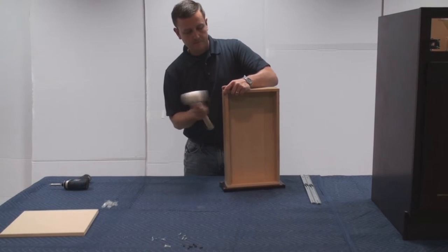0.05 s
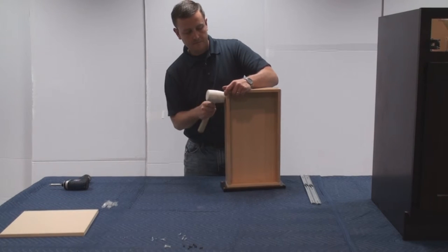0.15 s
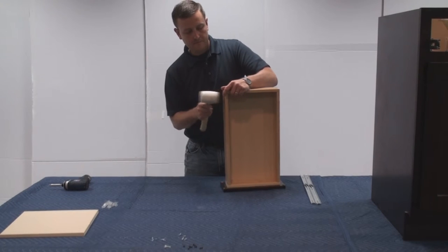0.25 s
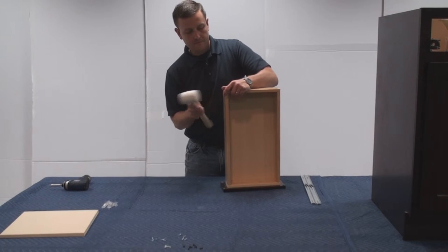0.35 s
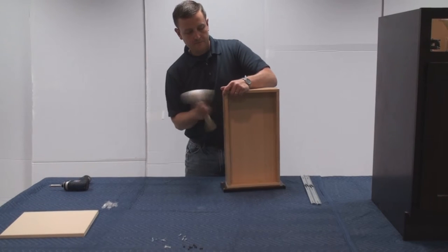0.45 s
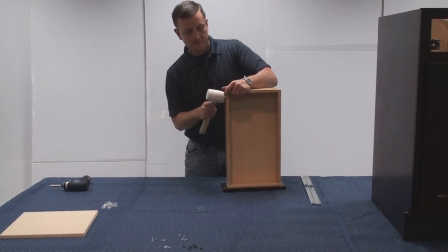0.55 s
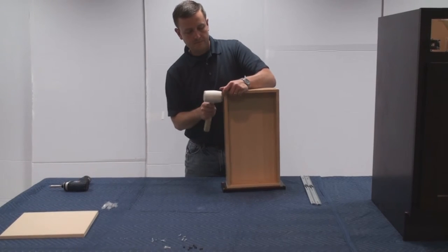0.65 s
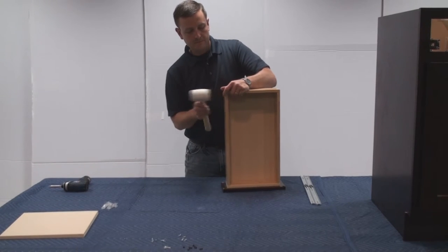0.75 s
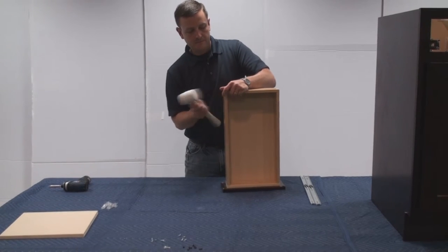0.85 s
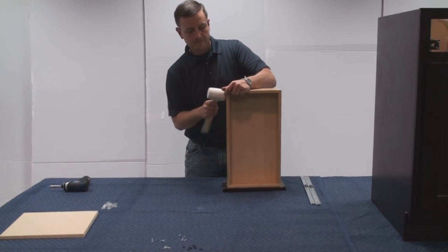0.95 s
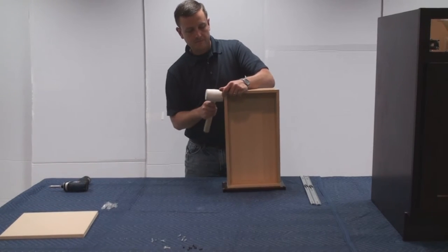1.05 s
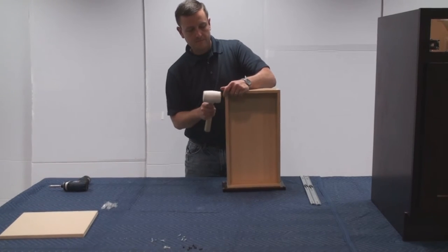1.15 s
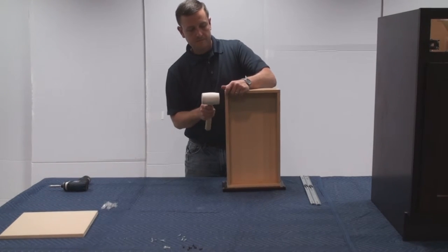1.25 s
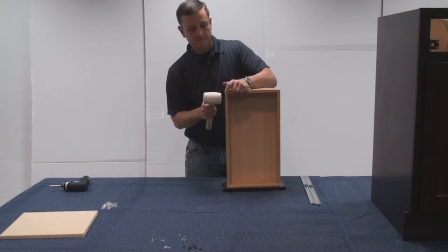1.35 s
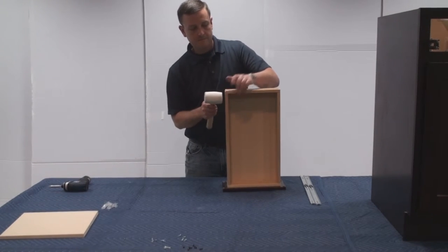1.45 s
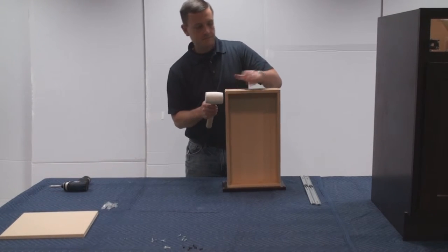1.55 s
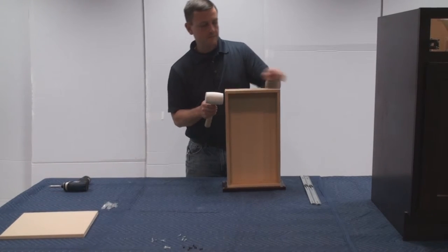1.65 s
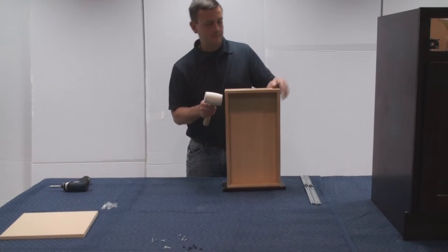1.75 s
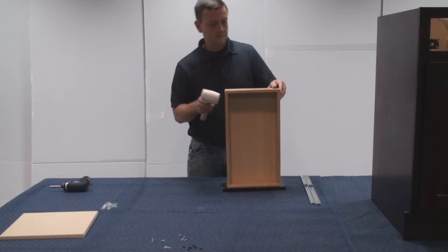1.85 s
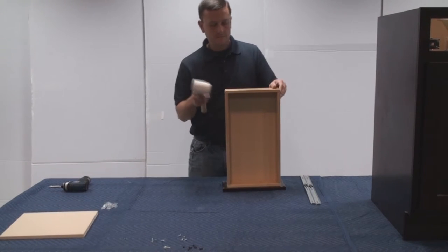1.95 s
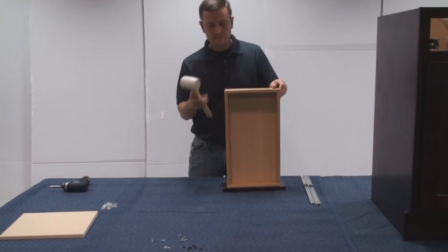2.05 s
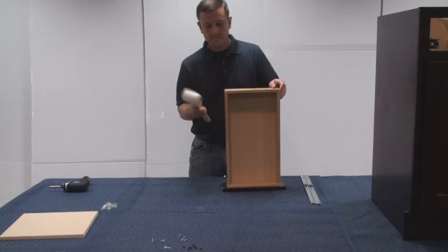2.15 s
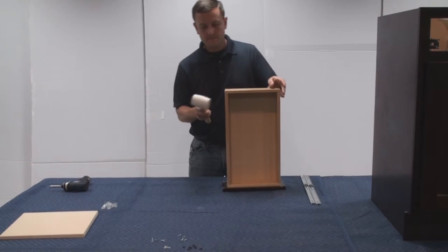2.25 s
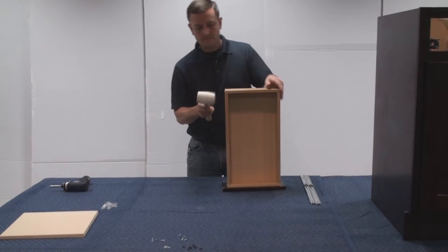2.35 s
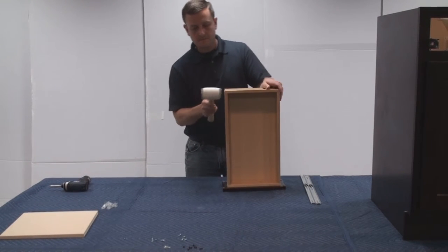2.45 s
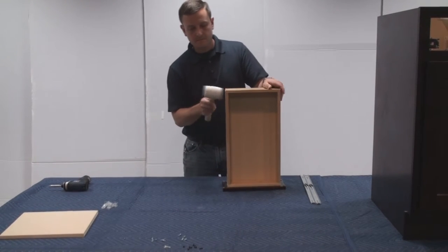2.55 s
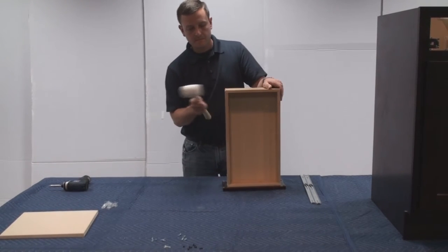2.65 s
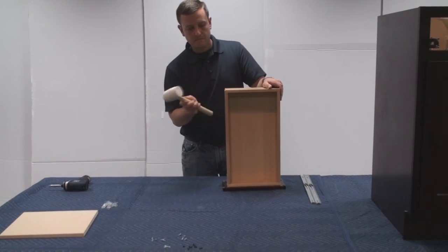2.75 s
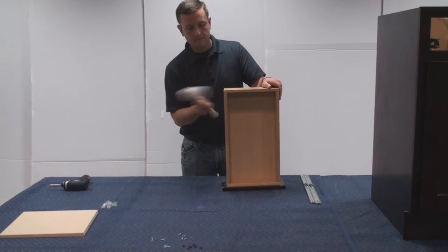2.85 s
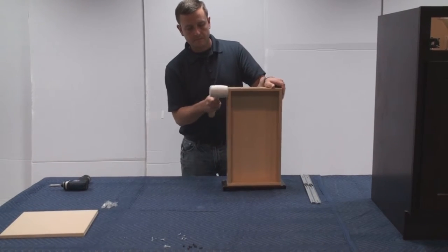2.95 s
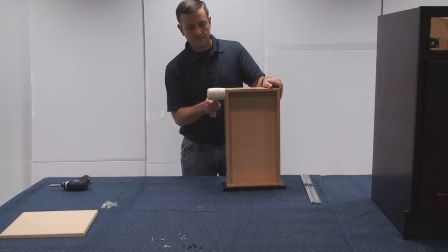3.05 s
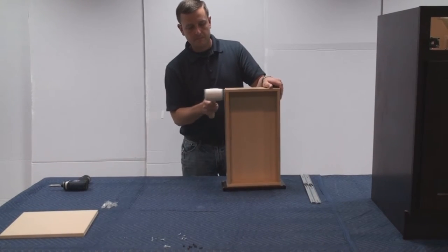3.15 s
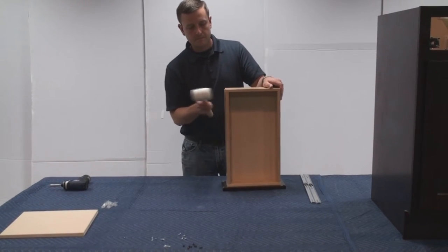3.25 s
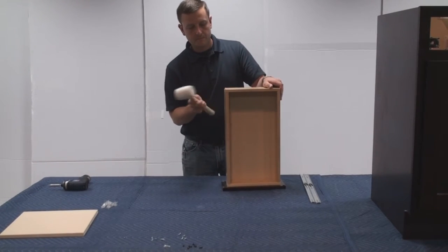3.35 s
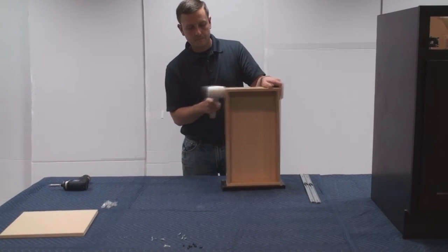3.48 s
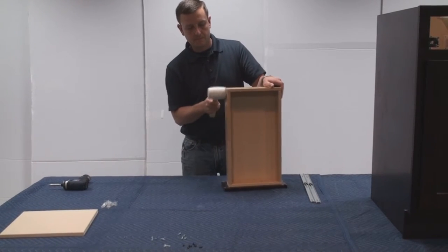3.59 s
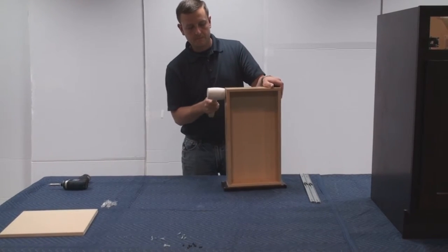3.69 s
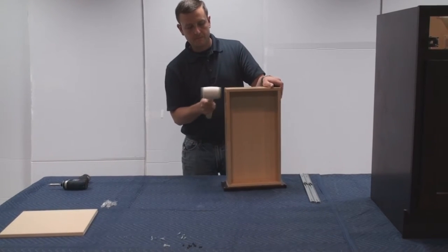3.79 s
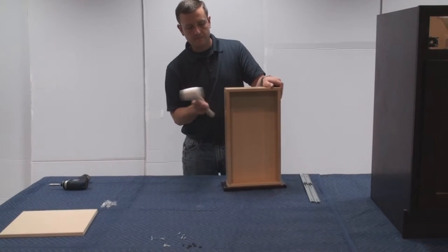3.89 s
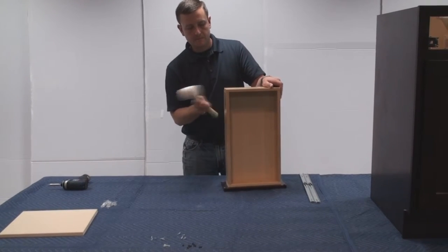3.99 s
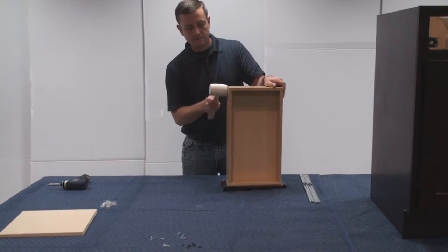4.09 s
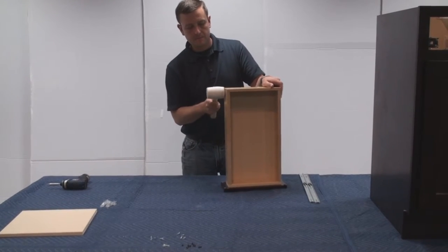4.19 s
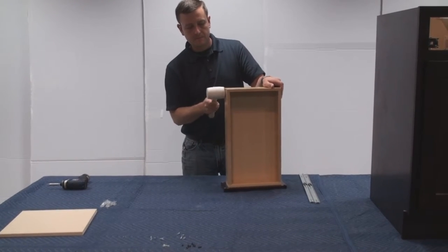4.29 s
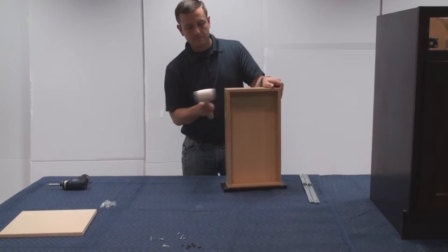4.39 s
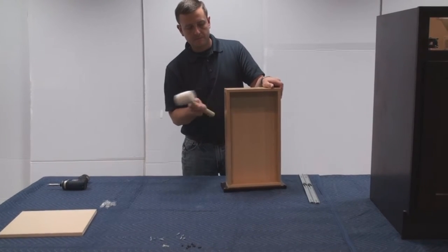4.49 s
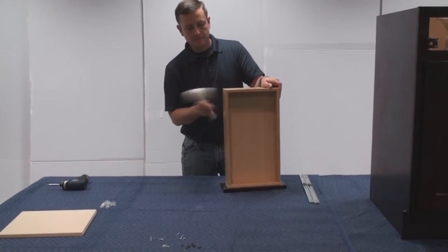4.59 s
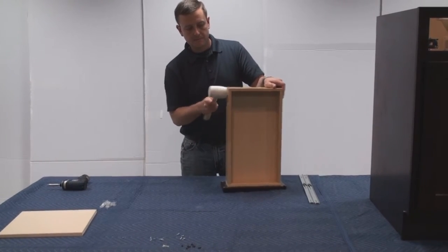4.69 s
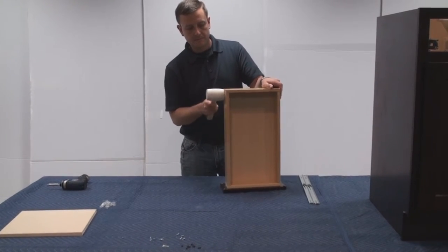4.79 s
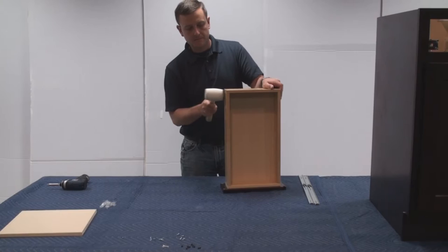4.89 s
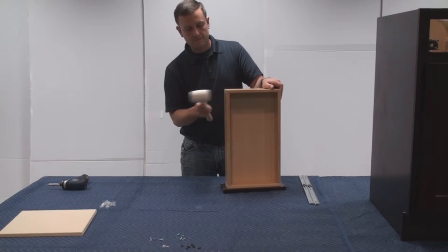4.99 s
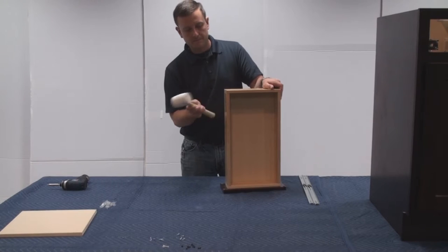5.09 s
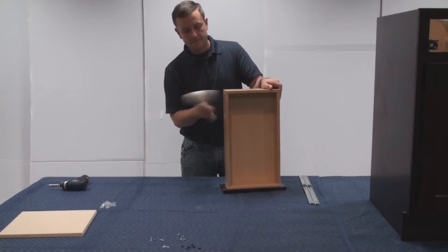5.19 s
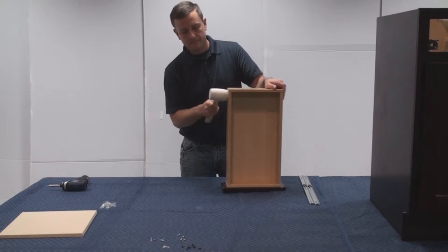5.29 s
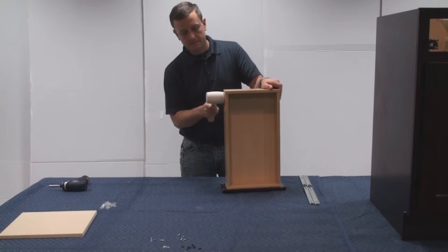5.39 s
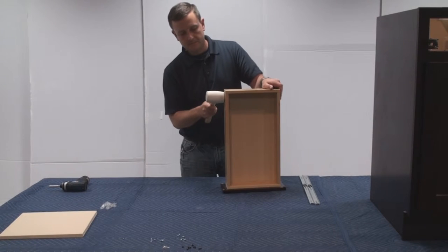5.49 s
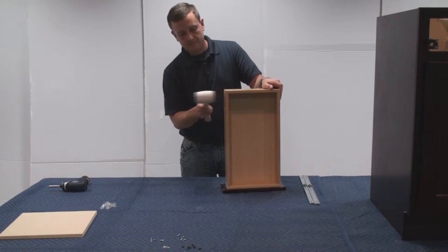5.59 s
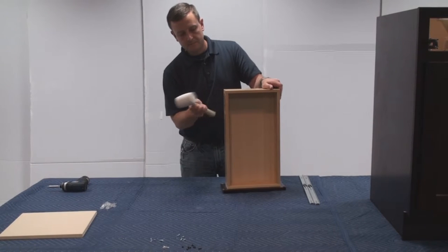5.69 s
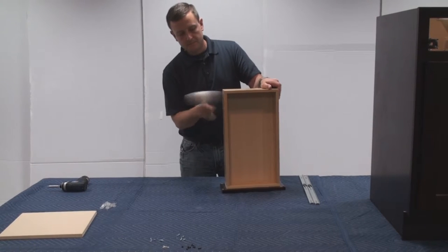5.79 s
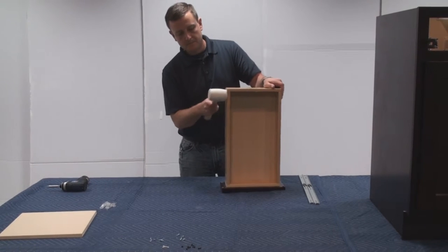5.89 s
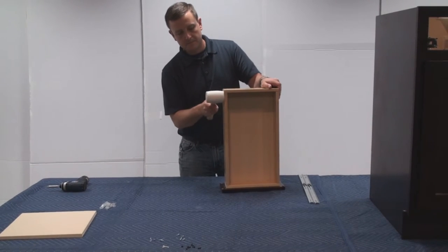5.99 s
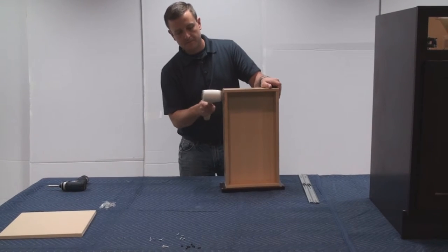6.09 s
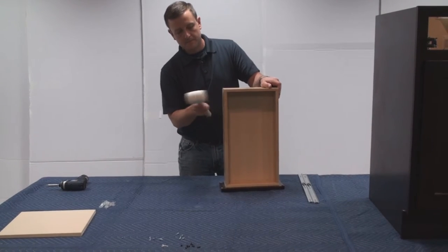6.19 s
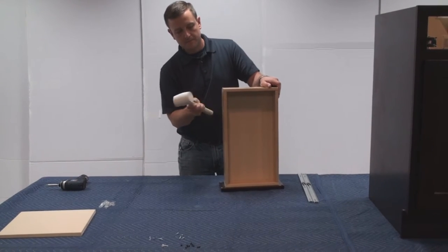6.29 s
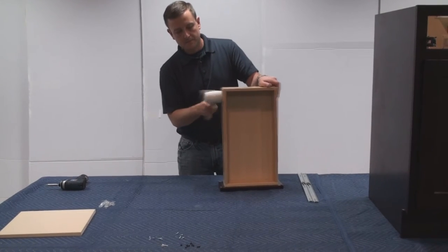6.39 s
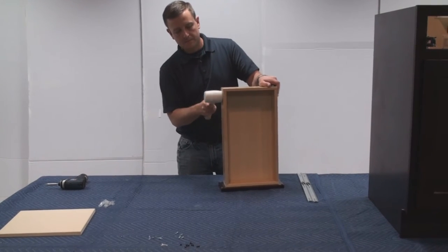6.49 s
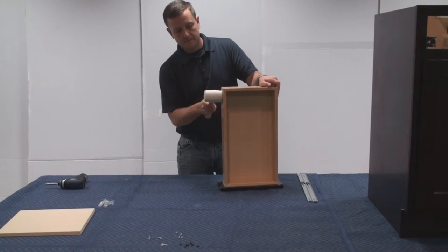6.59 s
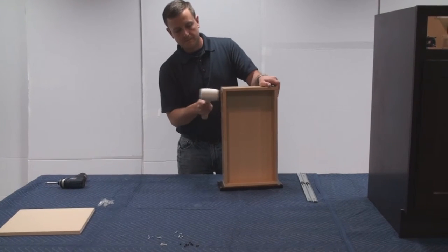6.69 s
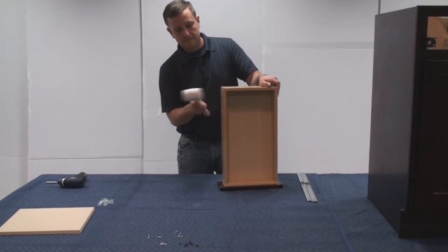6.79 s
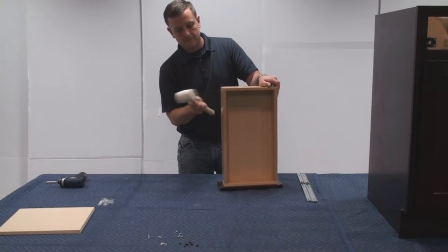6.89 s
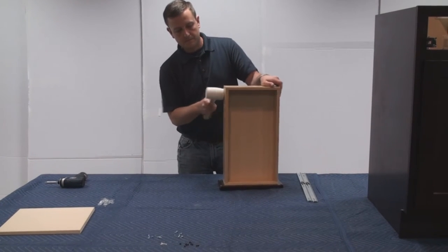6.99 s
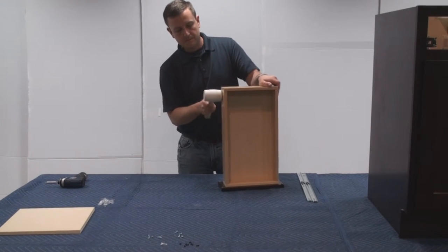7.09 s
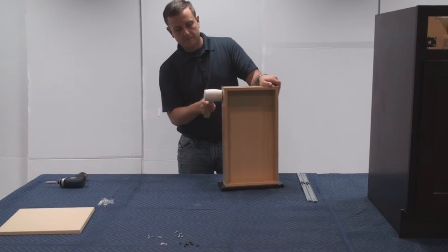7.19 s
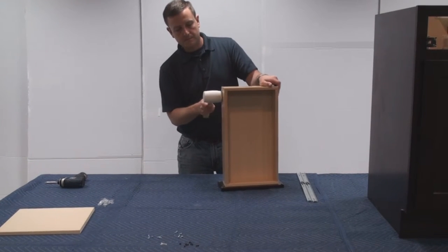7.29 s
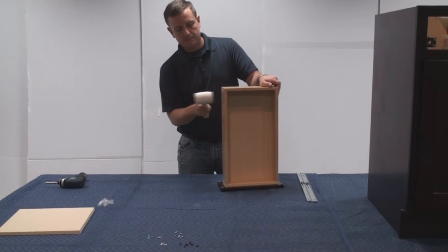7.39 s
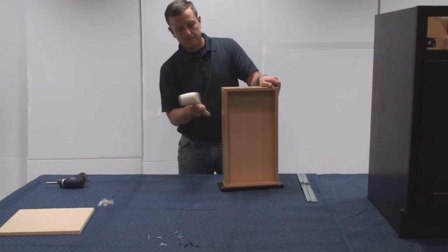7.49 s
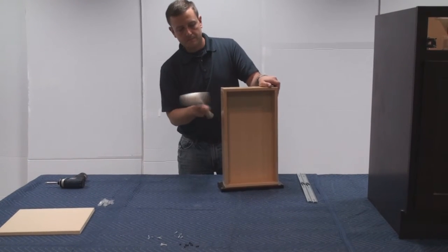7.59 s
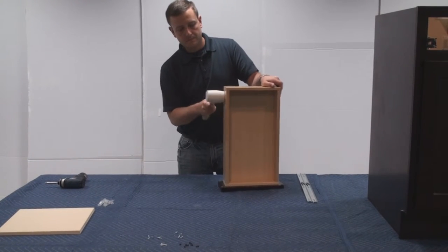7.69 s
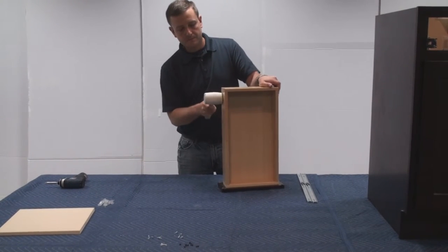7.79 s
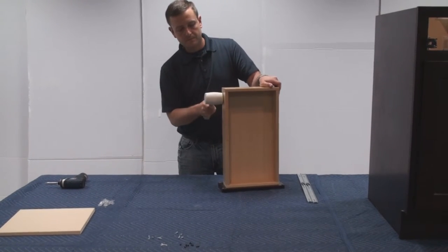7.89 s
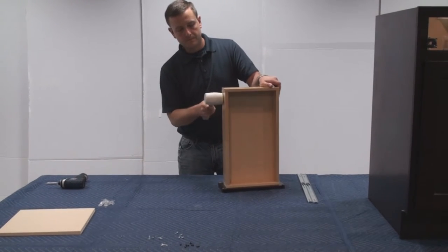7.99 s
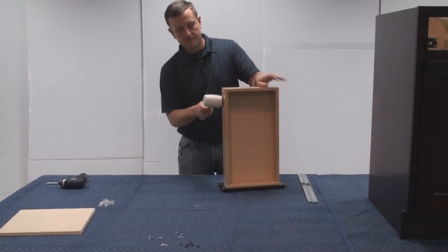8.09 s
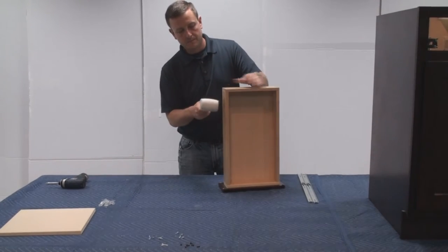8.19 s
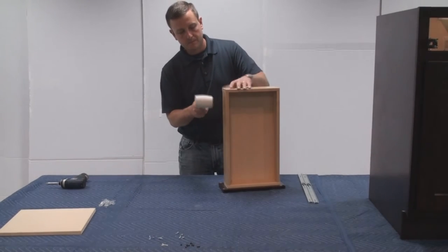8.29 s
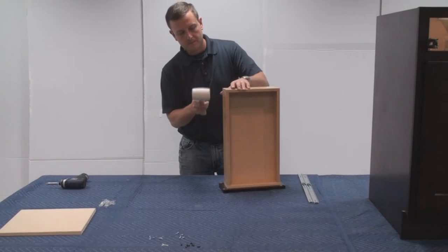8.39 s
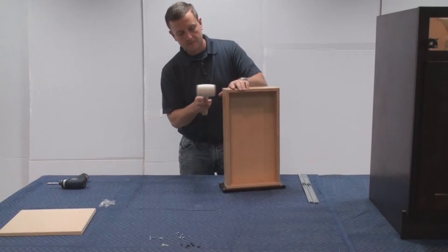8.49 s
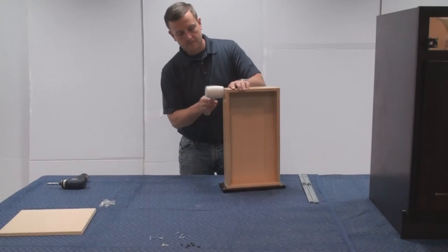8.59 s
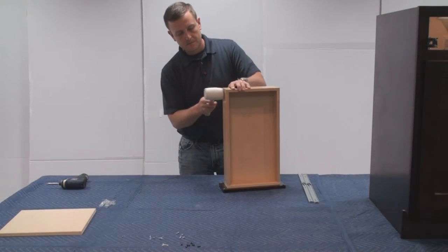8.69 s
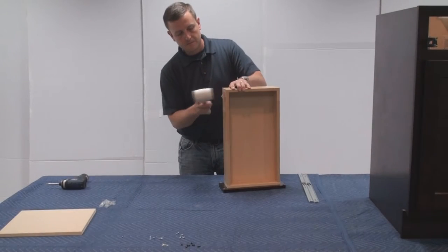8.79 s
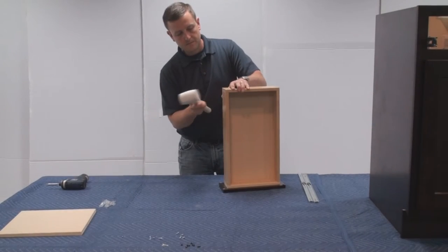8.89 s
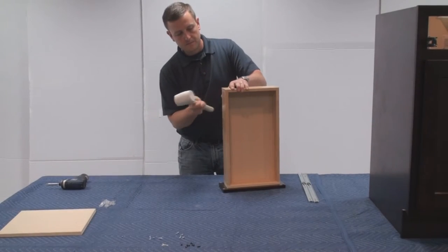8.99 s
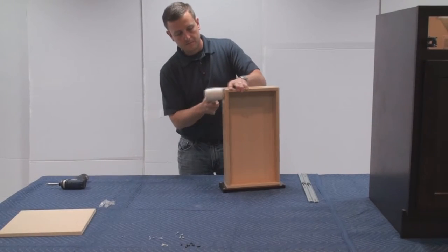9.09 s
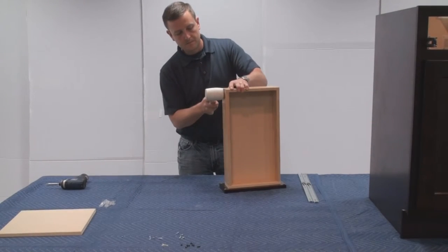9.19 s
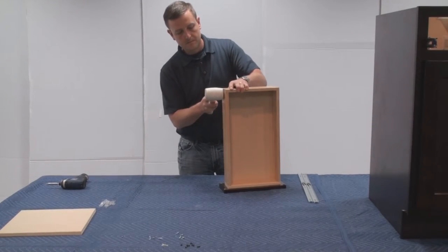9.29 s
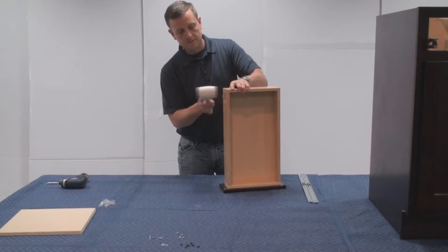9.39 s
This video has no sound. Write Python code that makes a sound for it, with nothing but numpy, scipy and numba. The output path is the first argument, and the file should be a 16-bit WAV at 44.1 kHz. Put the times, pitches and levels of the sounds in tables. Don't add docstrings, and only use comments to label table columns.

```python
import sys
import numpy as np
from scipy import signal
from scipy.fft import rfft, irfft, next_fast_len
from scipy.io import wavfile
from numba import njit

SR = 44100
rng = np.random.default_rng(int(sys.argv[2]) if len(sys.argv) > 2 else 0)


def inscribe(sig):
    pcm = np.round(np.clip(np.atleast_2d(sig).T, -1, 1) * 32767)
    wavfile.write(sys.argv[1], SR, pcm.astype(np.int16))


def volts_from_decibels(level):
    exponent = np.asarray(level, float) / 20
    return 10 ** exponent


N = 416744
LEAD = SR // 4

# start_s, level_db, panel_pitch_hz, thud_db, crack_db
MALLET_BLOWS = [
    (-.12, 3, 640, 3, -11.5),
                (0.2462, 5.9, 599, 0, -3), (0.6342, 5, 576.4, -14, -2.5), (1.0545, 4.2, 576, 2.5, -2),
         (3.036, 8.7, 600, -3.5, 1), (3.6337, 7.6, 594.3, -1, -2.5), (4.1865, 3.9, 551, 12, 3.5),
         (4.7653, 4.2, 663, 6, 2), (5.3661, 3.4, 592, 7.5, 1), (5.9628, 2.6, 600, 6, 0.5),
         (6.538, 5.5, 587.4, -33, -0.5), (7.0973, 3.7, 631, -4, 0), (7.7784, 3.3, 639.7, -1, 1.5),
         (9.232, 2.4, 602.6, -6.5, -4)]
TOUCHES = [
    (2.643, 1.5, 586, 3, -8.5),
    (8.743, -7.5, 601, 4.9, -21.5),
    (9.008, -41, 572, 11, -30),
]
BLOW_DB, TOUCH_DB = 22, 8.5

# pitch_hz, level_db, t60_s
THUD = [(335.3, -8.5, 0.046), (388, -15, 0.095), (436.4, -12, 0.069), (450.5, -8.5, 0.011)]
PANEL = [(493.8, -0.5, 0.039), (601.7, -1, 0.049), (662.6, 5, 0.031), (721.3, 8, 0.016), (791, -15.5, 0.13)]
SIDE_WALL = [(975.7, -6, 0.038), (1207, -3, 0.03), (1257, 0, 0.026), (1316.5, 11.5, 0.013),
             (1287, -59.5, 0.02)]
BENCH = [(136, -11.5, 0.081), (202, -8.5, 0.042), (235.3, -7.5, 0.062), (290, -8, 0.057)]
EDGE = [(2042, -5.5, 0.035), (2380, -6, 0.019), (2700, 10, 0.0083), (4000, -60, 0.15)]
LOOSE_JOINT = [(534, -19, 0.01), (785, 2, 0.013), (1273, -0.5, 0.29), (1050, -22, 0.017), (1900, 0.5, 0.04),
               (1990, 10.5, 0.0099), (3100, 2, .015), (3640, -20, 0.015)]
BOTTOM_RING = [(603.3, -22, 0.71)]

# freq_hz, level_db
CRACK = [(200, -13), (800, 1), (1600, 6), (2500, 0), (4000, 1.5), (7000, -10), (11000, -17), (16000, -38)]
SLAP = [(2500, -13), (6500, -1), (10000, -8), (13000, -8), (16000, -30)]
SLAP_DB, SLAP_S = -7, 0.0021
CLICK_DB, RATTLE_DB, RATTLE_S = 16.5, -16, 0.03

WALL_PER_CRACK = 0.33
HAND_MOVES_S = 2.9
WALL_HELD_DB, WALL_FREE_DB, SEATING_DB_PER_S = 0, 5, -0.62

# start_s, level_db, joint_ring_db
TICKS = [
    (2.5112, -15.5, -18.5),
    (2.516, -20, -4),
    (2.531, -30.5, -0.5),
]

SQUEAK_S, SQUEAK_LENGTH_S, SQUEAK_FROM_HZ, SQUEAK_TO_HZ = 2.334, 0.021, 2343, 1960
SQUEAK_DB, SECOND_DB, THIRD_DB = -22.5, -10, -24

# start_s, length_s, level_db
RUSTLES = [
    (1.822, 0.012, -57),
    (2.308, 0.08, -58),
    (2.508, 0.0074, -46),
]

# freq_hz, t60_s
ROOM_T60 = [(60, 0.69), (250, 0.42), (700, 0.52), (2000, 0.5), (5000, 0.4), (10000, 0.33), (16000, 0.2)]
# freq_hz, likeness_0_to_1
ROOM_ALIKE = [(60, 1), (300, 0.2), (700, 0.4), (3000, 0.26), (8000, 0.13)]
FAR_DB, FAR_STRETCH = -15, 1.592

# freq_hz, level_db_per_hz
AIR = [(25, -6), (65, 9), (95, -15), (130, -2), (900, -3.5), (3000, -12.5), (10000, -27.5), (15500, -37.5)]
AIR_DB = -48
# freq_hz, likeness_0_to_1
AIR_ALIKE = [(60, 0.95), (130, 0.8), (290, 0.16), (640, 0.5), (1410, 0.15), (3100, 0), (6820, 0.5),
             (15000, 0)]
# freq_hz, left_minus_right_db
AIR_LEFT = [(60, -19.5), (130, -22.5), (380, -13), (700, -7.5), (2380, -1.5), (4400, -7.5), (8120, 0),
            (15000, -14)]
BOX_LEFT = [(60, -16), (150, -14.5), (380, -6.5), (900, -8), (2380, -8.5), (4400, -10.5), (8120, -6),
            (15000, -17.5)]
# pitch_hz, level_db
HUM = [(120, -53)]
# freq_hz, level_db
LOW_CUT = [(25, -16), (45, -9), (80, 0.5)]


def mallet(rows, db):
    out, t = np.zeros(N + 2 * LEAD), np.arange(LEAD) / SR
    chance = rng.standard_normal((len(rows), 5, 2, 5))
    grit = rng.standard_normal((len(rows), LEAD))
    for row, c, g in zip(rows, chance, grit):
        start_s, blow_db = row[:2]
        knock = box_wood(row, t, c) + joint_crack(row, t, g)
        crack_db = row[4]
        rise_s = 0.003 * volts_from_decibels(-0.2 * crack_db)
        box_knock = knock * np.minimum(t / rise_s, 1) ** 2.46
        box_knock = box_knock + rubber_slap(crack_db, t, g)
        at = LEAD + int(start_s * SR)
        out[at:at + LEAD] += volts_from_decibels(blow_db + db + 14) * box_knock / np.sqrt(np.sum(box_knock ** 2))
    return out


def box_wood(row, t, c):
    start_s, _, panel_hz, thud_db, crack_db = row
    stretch = panel_hz / PANEL[1][0]
    wood = ring(PANEL, t, stretch, c[0])
    wood = wood + volts_from_decibels(0.23 * thud_db) * ring(BENCH, t, 0.956, c[1] / 2)
    wood = wood + volts_from_decibels(thud_db) * ring(THUD, t, 0.93, c[2])
    wood = wood + volts_from_decibels(wall_ring_db(start_s, crack_db)) * ring(SIDE_WALL, t, 0.99, c[3])
    wood = wood + volts_from_decibels(0.7 * crack_db) * ring(EDGE, t, 1, c[4], drift=0.008)
    wood = wood + ring(BOTTOM_RING, t, stretch, 0 * c[0]) * (1 - t / t[-1])
    press_s = 0.00043 * volts_from_decibels(-0.4 * crack_db)
    return wood * (1 - np.exp(-t / press_s))


def wall_ring_db(s, crack_db):
    grip_db = WALL_HELD_DB
    if s >= HAND_MOVES_S:
        grip_db = WALL_FREE_DB + SEATING_DB_PER_S * (s - HAND_MOVES_S)
    return grip_db + WALL_PER_CRACK * crack_db


def joint_crack(row, t, g):
    crack_db = row[4]
    snap = volts_from_decibels(RATTLE_DB) * g * np.exp(-t / RATTLE_S)
    snap[130] += volts_from_decibels(CLICK_DB)
    sharpness = [(hz, db + 0.17 * crack_db * np.log2(hz / 2000)) for hz, db in CRACK]
    return volts_from_decibels(crack_db + 6) * colour(snap, sharpness)


def rubber_slap(crack_db, t, g):
    puff = g[::-1] * t / SLAP_S * np.exp(1 - t / SLAP_S)
    return volts_from_decibels(SLAP_DB + 2.1 * crack_db) * colour(puff, SLAP)


def ring(modes, t, stretch, chance, scatter_db=1.2, drift=0.012):
    hz, db, t60 = np.transpose(modes)[:, :, None]
    gain = volts_from_decibels(db + scatter_db * chance[0, :len(modes), None])
    hz = hz * stretch * (1 + drift * chance[1, :len(modes), None])
    decay = np.exp(-np.log(1000) * t / t60)
    return np.sum(gain * np.sin(2 * np.pi * hz * t) * decay, axis=0)


def ticks():
    out, t = np.zeros(N + 2 * LEAD), np.arange(LEAD) / SR
    chance = rng.standard_normal((len(TICKS), 2, 8))
    grit = rng.standard_normal((len(TICKS), LEAD))
    for (s, db, ring_db), c, g in zip(TICKS, chance, grit):
        click = volts_from_decibels(1) * colour(g * np.exp(-t / 0.0023), CRACK)
        chatter = volts_from_decibels(ring_db) * ring(LOOSE_JOINT, t, 0.98, c)
        at = LEAD + int(s * SR)
        out[at:at + LEAD] += volts_from_decibels(db) * (chatter + click)
    return out


def squeak():
    t = (np.arange(N + 2 * LEAD) - LEAD) / SR
    u = np.clip(t - SQUEAK_S, 0, SQUEAK_LENGTH_S) / SQUEAK_LENGTH_S
    sag = (SQUEAK_TO_HZ - SQUEAK_FROM_HZ) * u ** 3 / 3
    phase = 2 * np.pi * SQUEAK_LENGTH_S * (SQUEAK_FROM_HZ * u + sag)
    tone = np.sin(phase) + volts_from_decibels(SECOND_DB) * np.sin(2 * phase) + volts_from_decibels(THIRD_DB) * np.sin(3 * phase)
    return volts_from_decibels(SQUEAK_DB) * tone * np.sin(np.pi * u ** 0.8)


def rustle():
    t = (np.arange(N + 2 * LEAD) - LEAD) / SR
    shape = sum(volts_from_decibels(db) * (t > s) * np.exp(-np.abs(t - s) / length) for s, length, db in RUSTLES)
    return colour(shape * rng.standard_normal(len(t)), [(3000, -1), (8000, 9), (14000, 5)])


def room(x, direct_db=-13, build_s=0.021):
    pair, hz = noise_pair(SR, ROOM_ALIKE)
    t, echo = np.arange(SR) / SR, 0
    for centre_hz in 40 * 2 ** np.arange(0, 9, 0.5):
        share = np.clip(1 - 2 * np.abs(np.log2(np.maximum(hz, 1) / centre_hz)), 0, 1)
        t60 = table(ROOM_T60, centre_hz)
        decay = volts_from_decibels(-60 * t / t60) + volts_from_decibels(FAR_DB - 60 * t / t60 / FAR_STRETCH)
        echo = echo + irfft(pair * share) * decay
    echo = echo * (1 + 1.8 * np.exp(-t / 0.024))
    echo = echo * (1 - np.exp(-t / build_s)) * volts_from_decibels(-41.5)
    echo[:, 0] = volts_from_decibels(direct_db)
    return signal.fftconvolve(x[None], echo, axes=1)[:, LEAD:LEAD + N]


def ventilation():
    pair, hz = noise_pair(next_fast_len(N), AIR_ALIKE)
    lean_db = table(AIR_LEFT, hz) / 2
    air = irfft(pair * volts_from_decibels(table(AIR, hz) + np.array([lean_db, -lean_db])))[:, :N]
    air = air * volts_from_decibels(AIR_DB) / np.std(air)
    t = np.arange(N) / SR
    hum = sum(volts_from_decibels(db) * np.sin(2 * np.pi * f * t) for f, db in HUM)
    return air + hum * volts_from_decibels(np.array([[-19], [0]]))


def noise_pair(count, alike):
    hz = np.fft.rfftfreq(count, 1 / SR)
    c = np.clip(table(alike, hz), 0, 1)
    mid, side = rfft(rng.standard_normal((2, count)))
    mid, side = mid * np.sqrt((1 + c) / 2), side * np.sqrt((1 - c) / 2)
    return np.array([mid + side, mid - side]), hz


def table(points, hz):
    f, v = np.transpose(points)
    return np.interp(np.log(np.maximum(hz, 1)), np.log(f), v)


def colour(x, points, size=2048):
    cep = irfft(np.log(volts_from_decibels(table(points, np.fft.rfftfreq(size, 1 / SR)))))
    cep[1:size // 2] *= 2
    cep[size // 2 + 1:] = 0
    return signal.fftconvolve(x, irfft(np.exp(rfft(cep))))[:len(x)]


@njit
def follow(x, attack, release, start):
    e, out = start, np.empty(len(x))
    for i in range(len(x)):
        e += (x[i] - e) * (attack if x[i] > e else release)
        out[i] = e
    return out


def scene():
    box = mallet(MALLET_BLOWS, BLOW_DB) + mallet(TOUCHES, TOUCH_DB)
    box = box + ticks() + squeak() + rustle()
    box = colour(box, [(40, -2.5), (110, -19.5), (170, -0.5)])
    left, right = room(box)
    return np.array([colour(left, BOX_LEFT), np.roll(right, 1)]) * volts_from_decibels(7) + ventilation()


def roll_off(x):
    return signal.sosfilt(signal.butter(12, 15660, fs=SR, output="sos"), x)


def record(dry, knee_db=-2, slow_knee_db=-20, slow_depth=0.048):
    size = np.max(np.abs(dry), axis=0)
    size = np.roll(size, -int(0.0015 * SR))
    quick = follow(size, 1 / (0.00079 * SR), 1 / (0.037 * SR), 0.33)
    slow = follow(np.minimum(size, volts_from_decibels(5.5)), 1 / (0.06 * SR), 1 / (0.9 * SR), 0.14)
    gain = np.minimum(volts_from_decibels(knee_db) / quick, 1) * np.minimum(volts_from_decibels(slow_knee_db) / slow, 1) ** slow_depth
    driven = dry * gain * volts_from_decibels(7.5)
    mix = np.clip([colour(x, LOW_CUT, size=8192) for x in driven], -1, 1)
    return roll_off(mix)


dry = scene()
out = record(dry)
inscribe(out)
```